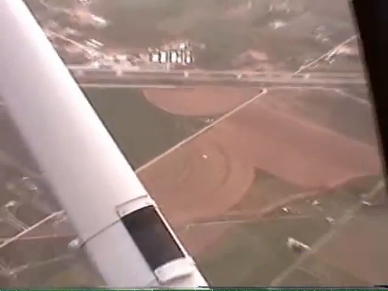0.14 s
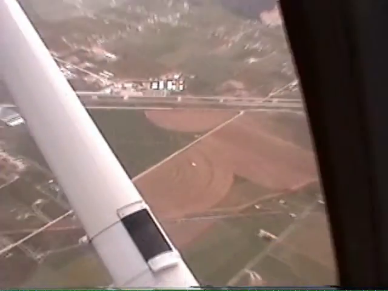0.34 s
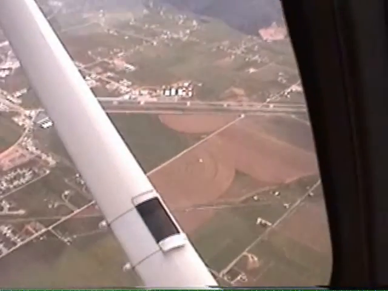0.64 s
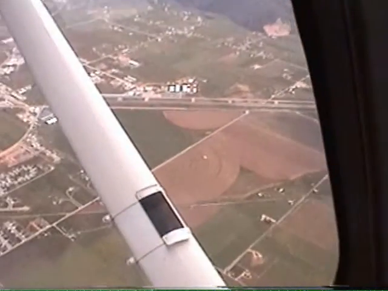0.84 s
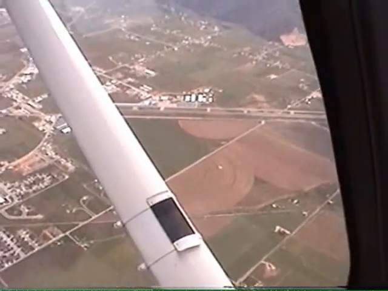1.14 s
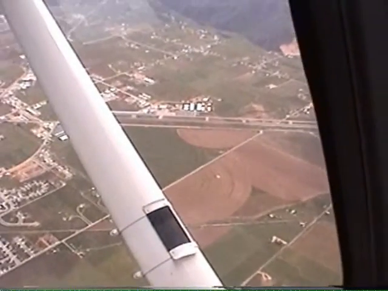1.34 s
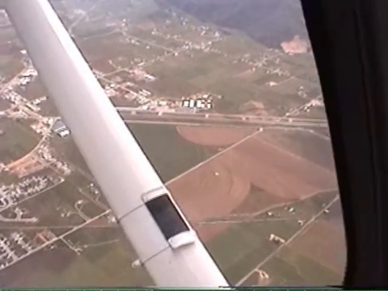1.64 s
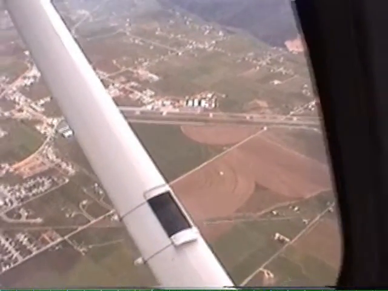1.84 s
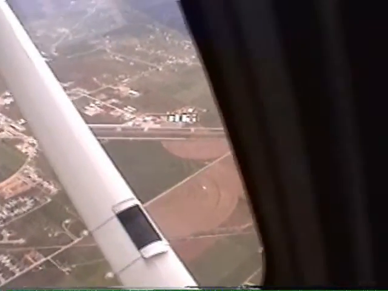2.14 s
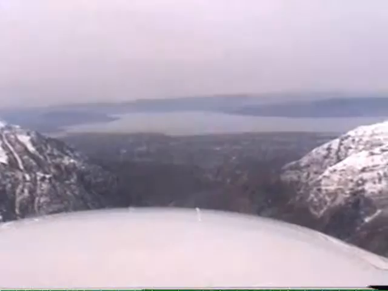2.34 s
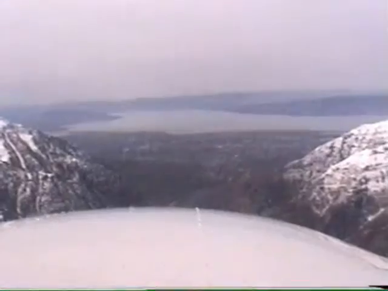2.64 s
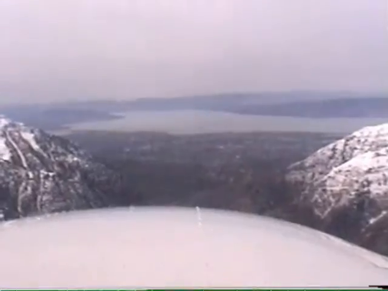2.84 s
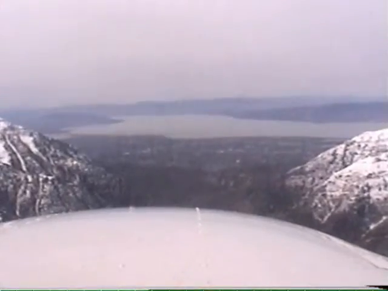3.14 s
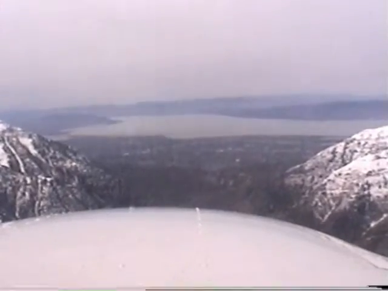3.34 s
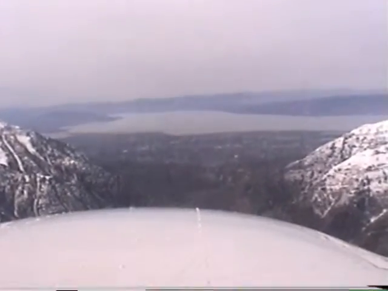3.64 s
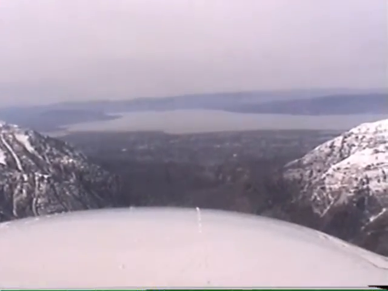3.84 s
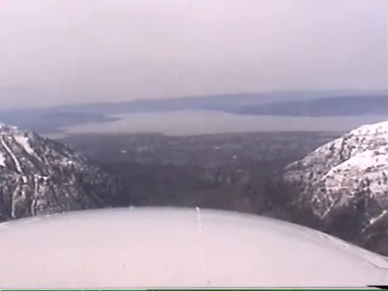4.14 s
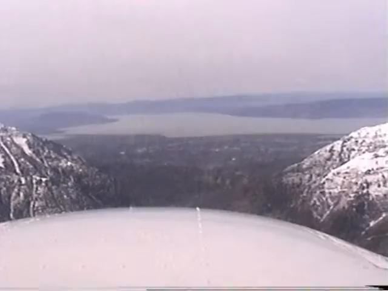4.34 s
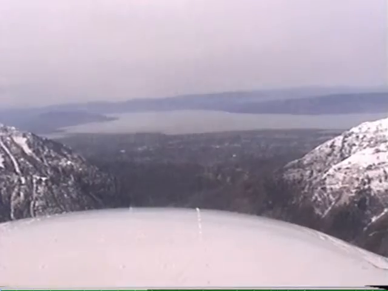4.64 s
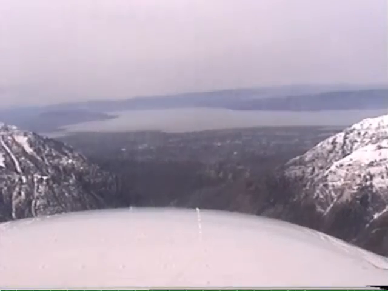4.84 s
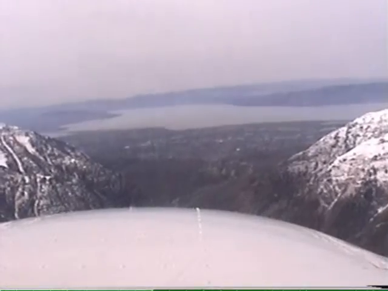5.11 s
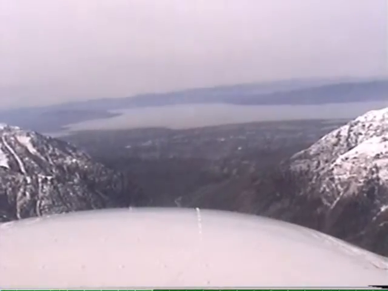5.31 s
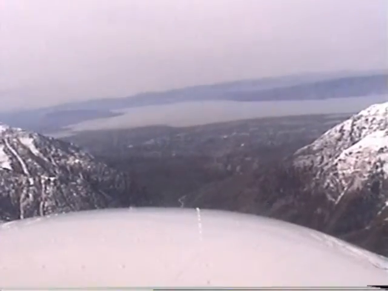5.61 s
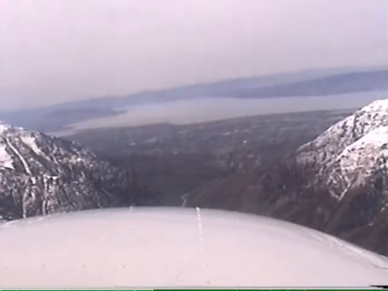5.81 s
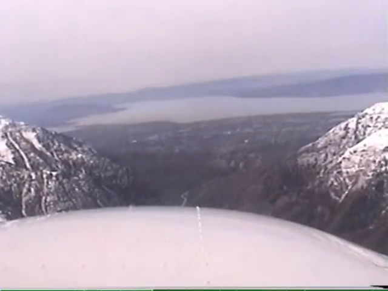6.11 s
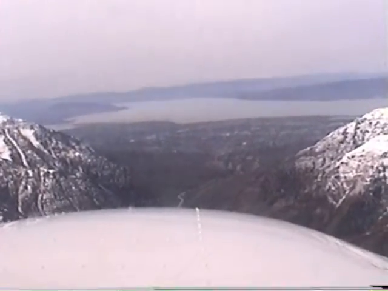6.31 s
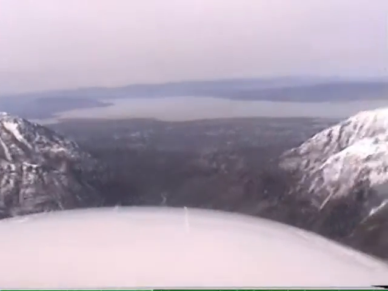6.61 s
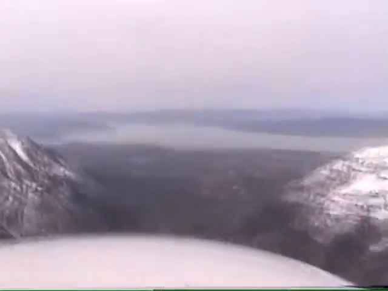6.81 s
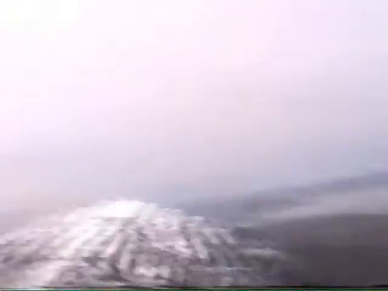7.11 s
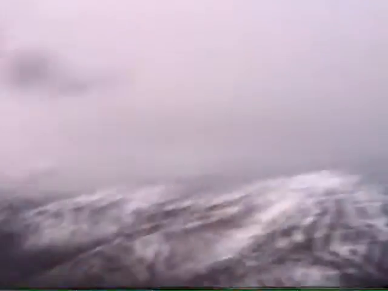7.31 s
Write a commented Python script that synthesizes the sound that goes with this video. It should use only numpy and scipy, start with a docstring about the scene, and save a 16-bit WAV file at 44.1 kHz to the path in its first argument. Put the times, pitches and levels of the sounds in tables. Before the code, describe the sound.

A light aircraft's engine and propeller drone steadily, picked up by a microphone in the cabin, with air hissing past the window. After a sudden second of near silence, the engine comes back as a rougher, ringing roar behind the windscreen. It slows very slightly, then the airflow briefly swells and the engine's tone shifts. The sound sits in the left channel.

```python
"""Inside the cabin of a four-cylinder propeller plane in cruise: two shots, a second of dead air between.
First the deep drone at the side window, then the harsher roar behind the windscreen, where engine
clatter rings the panels. Slipstream hisses through both. Exhaust pulses and propeller blades make the
drone; its low tones form standing waves, so their balance shifts as the engine slows or the camera moves.
Only the left channel is live."""
import sys
import numpy as np
from scipy.fft import rfft, irfft, next_fast_len
from scipy.io import wavfile
from scipy.ndimage import uniform_filter1d, minimum_filter1d, map_coordinates

SR = 44100
rng = np.random.default_rng(int(sys.argv[2]) if len(sys.argv) > 2 else 0)


def log_audio(samples):
    """Write samples as a 16-bit WAV file to the path given in sys.argv[1]."""
    # one column per channel
    frames = np.atleast_2d(samples).T
    # limit to full scale, then quantise
    limited = np.clip(frames, -1, 1)
    pcm = np.round(limited * 32767).astype(np.int16)
    wavfile.write(sys.argv[1], SR, pcm)


N = 328986
T = np.arange(N) / SR


def amp(db):
    """Decibels to gain."""
    return 10 ** (np.asarray(db) / 20)


def along(points, hz):
    """Read (Hz, value) breakpoints on a log frequency axis."""
    f, v = np.transpose(points)
    return np.interp(np.log(hz + 1), np.log(f + 1), v)


def automation(points):
    """(time, value) breakpoints as one value per sample."""
    return np.interp(T, *np.transpose(points))


def wobble(rate):
    """A smooth random curve, rate knots a second."""
    return map_coordinates(rng.standard_normal(int(N * rate / SR) + 4), [T * rate])


def swell(peak_s, rise_s, fall_s):
    """A smooth bump from 0 up to 1 and back."""
    return np.exp(-((T - peak_s) / np.where(T < peak_s, rise_s, fall_s)) ** 2)


def shot(start_s, end_s, fade_s):
    """A shot's envelope: quick fade in, hard cut out."""
    return (1 - np.exp(-np.maximum(T - start_s, 0) / fade_s)) * np.clip((end_s - T) / 0.0014, 0, 1)


def white():
    """Noise of unit power per Hz."""
    return rng.standard_normal(N) * np.sqrt(SR / 2)


def filtered(x, response):
    """x through a frequency response."""
    size = next_fast_len(N + SR // 2)
    return irfft(rfft(x, size) * response(np.fft.rfftfreq(size, 1 / SR)), size)[..., :N]


def coloured(x, spectrum):
    """x through a smooth (Hz, dB) EQ curve."""
    return filtered(x, lambda hz: amp(along(spectrum, hz)))


def narrow_bands(x, bands):
    """x through a bank of steep-sided band-pass peaks."""
    peak = lambda f, hz, width: (2j * f * width / (hz * hz - f * f + 2j * f * width)) ** 2
    return filtered(x, lambda f: sum(amp(db) * peak(f, hz, width) for hz, width, db in bands))


def tone(cycles, order, level_db, waver_db, drift):
    """One partial at a multiple of a running cycle count, unsteady in level and phase (drift, radians)."""
    phase = 2 * np.pi * (order * cycles + rng.random()) + drift * wobble(7)
    return np.sqrt(2) * amp(level_db + waver_db * wobble(6.6)) * np.sin(phase)


def dead_air():
    """The electronics: low rumble, mains buzz, two thin whistles, and a brief hiss after the first cut."""
    mains_hz, line_scan_hz = 60, 15734
    rumble = coloured(white(), [(10, -81), (38, -88.5), (90, -101), (300, -116), (1200, -130),
                                (15000, -135)])
    buzz_db = [(120, -88.5), (180, -90.5), (420, -96.5), (700, -112), (1000, -104), (1300, -108)]
    buzz = sum(tone(mains_hz * T, k, along(buzz_db, mains_hz * k), waver_db=1.5, drift=.1)
               for k in range(2, 20))
    whistles = amp(-88) * np.sin(2 * np.pi * 8000 * T) + amp(-82) * np.sin(2 * np.pi * line_scan_hz * T)
    hiss = coloured(white(), [(100, -89), (2000, -92.5), (6000, -96), (15000, -112)])
    hiss_db = automation([(2.47, -61.5), (2.483, 0), (2.525, -5), (2.55, -58)])
    return rumble + buzz + whistles + hiss * amp(hiss_db)


def throb(firings, cycle, shaft, blade):
    """A gain that pulses once an engine cycle, once a shaft turn and once a blade pass, at these depths."""
    pulse = lambda order: np.cos(2 * np.pi * (order * firings + rng.random()))
    return 1 + cycle * pulse(1 / 4) + shaft * pulse(1 / 2) + blade * pulse(1)


def window_slipstream(firings):
    """Propeller wash pulses in the window seal; the hiss creeps up."""
    # air at the seal: (frequency [Hz], level [dB])
    spectrum = [(500, -100), (1200, -75), (1850, -70.5), (2800, -75.5), (4300, -76), (6000, -79),
                (7500, -85.5), (12000, -95.5), (14000, -103), (15700, -113)]
    rise_db_per_s = 0.72
    level_db = -0.76 + rise_db_per_s * T + 0.52 * wobble(18) + 0.26 * wobble(4)
    hiss = amp(level_db) * coloured(white(), spectrum)
    return hiss * throb(firings, cycle=0.079, shaft=0.059, blade=0.095)


def screen_slipstream(firings):
    """Air hisses over the windscreen with a light throb."""
    # air on the windscreen: (frequency [Hz], level [dB])
    spectrum = [(500, -98.5), (1100, -68), (1400, -67), (1900, -71.5), (2800, -76.5), (4400, -77),
                (4900, -80), (8500, -87), (11000, -89.5), (12800, -92.5), (14000, -101), (15500, -108)]
    hiss = amp(0.36 + 0.56 * wobble(22)) * coloured(white(), spectrum)
    return hiss * throb(firings, cycle=0.066, shaft=0.022, blade=0.043)


def slipstream_rush():
    """A faint high sizzle, then the slipstream swells as the camera swings."""
    # the rush of air: (frequency [Hz], level [dB])
    rush_spectrum = [(600, -81), (980, -61.5), (1300, -69), (1700, -67), (3300, -70.5), (6000, -79),
                     (12000, -94), (15000, -110)]
    # the sizzle: (frequency [Hz], level [dB])
    sizzle_spectrum = [(7000, -120), (10500, -91), (13000, -88), (15000, -115)]
    rush = swell(peak_s=7.38, rise_s=0.23, fall_s=0.12) * coloured(white(), rush_spectrum)
    sizzle = swell(peak_s=6.95, rise_s=0.09, fall_s=0.09) * coloured(white(), sizzle_spectrum)
    return rush + sizzle


def clatter(firings, locked):
    """Engine vibration: the locked share of its power repeats every four firings, the rest is turbulence."""
    period = int(np.round(4 * N / firings[-1]))
    random_phases = np.exp(2j * np.pi * rng.random(period // 2 + 1))
    cycle = irfft(random_phases, period) * np.sqrt(period * SR / 2)
    loop = map_coordinates(cycle, [firings / 4 % 1 * period], mode="grid-wrap")
    return np.sqrt(locked) * loop + np.sqrt(1 - locked) * white()


def window_roar(firings, settled):
    """Dark clatter and a thin engine whine near 13 times the firing rate, a faint cabin ring below it."""
    # body of the roar: (frequency [Hz], level [dB])
    spectrum = [(15, -75), (50, -68.5), (95, -57), (200, -55), (350, -57.5), (520, -59.5), (700, -62.5),
                (820, -69), (950, -63), (1300, -76.5), (2500, -100), (6000, -140)]
    # the engine whine, then the cabin ring: (frequency [Hz], width [Hz], peak level [dB])
    whine_and_ring = [(1120, 7.3, -59.5), (1018, 40, -76)]
    shake = clatter(firings, locked=0.1) * throb(firings, cycle=0.08, shaft=0.045, blade=0.066)
    level_db = -0.77 - 2.5 * (1 - settled) + 0.56 * wobble(9)
    return amp(level_db) * (coloured(shake, spectrum) + narrow_bands(white(), whine_and_ring))


def screen_roar(firings, slowed, turned):
    """Clatter roars and rings the windscreen and panel: a little less ring when slowed, far less turned."""
    # body of the roar: (frequency [Hz], level [dB])
    spectrum = [(15, -80.5), (35, -66.5), (55, -60.5), (140, -58.5), (185, -55), (245, -56.5), (285, -61),
                (335, -51.5), (460, -57.5), (700, -55.5), (860, -66.5), (1020, -59.5), (1150, -71),
                (2200, -103), (6000, -140)]
    # ringing panels and air spaces: (frequency [Hz], width [Hz], peak level [dB])
    modes = [(757, 29.2, -50), (792, 17.8, -49), (911, 20.6, -51.5), (1190, 15, -62), (1344, 38, -66),
             (1588, 11, -62.5), (2126, 47, -73), (2409, 42, -69), (3260, 172, -69.5), (3743, 109, -77),
             (4270, 160, -76.5), (5870, 220, -83), (7970, 150, -87.5)]
    shake = clatter(firings, locked=0.12) * throb(firings, cycle=0.16, shaft=0.056, blade=0.14)
    panel_shake = clatter(firings, locked=0.1) * throb(firings, cycle=0.21, shaft=0.055, blade=0.12)
    ring = amp(-0.85 * slowed - 8 * turned) * narrow_bands(panel_shake, modes)
    return amp(0.18 + 0.66 * wobble(9)) * (coloured(shake, spectrum) + ring)


def engine_overtones(firings, orders, waver_db, drift):
    """Looser engine tones; the quarter orders come from unequal cylinders."""
    return sum(tone(firings, order, db, waver_db, drift) for order, db in orders)


def drone(firings, harmonics, shift):
    """Exhaust pulses and propeller blades: clean low harmonics that rebalance as shift goes from 0 to 1."""
    # one harmonic briefly swells or dips: (time [s], harmonic number, change [dB], half-length [s])
    fades = [(1.167, 3, -4.5, .2), (1.25, 1, -3, .45), (1.85, 2, -3.5, .3), (4.031, 4, -9.5, .25),
             (6.2, 5, 6, .3), (7.208, 2, -12.5, 0.12), (7.45, 4, -6.5, 0.11)]
    out = np.zeros(N)
    for k, (from_db, to_db) in enumerate(harmonics, 1):
        fade_db = sum(change * swell(s, half, half) for s, number, change, half in fades if number == k)
        level_db = from_db + (to_db - from_db) * shift + 0.25 * wobble(3.4) + fade_db
        out += tone(firings, k, level_db, waver_db=0.33, drift=0.067)
    return out


def side_window():
    """Beside the door the drone dominates, over roar and slipstream."""
    # engine speed: (time [s], firing rate [Hz])
    speed = [(0, 85.8), (1.4, 86.26), (1.8, 86.4), (2.48, 87)]
    # drone harmonics from the first up: (opening level [dB], settled level [dB])
    harmonics = [(-38.5, -37.5), (-22, -23.5), (-33, -27.5), (-37, -31.5)]
    # weaker engine tones: (order [x firing rate], level [dB])
    orders = [(5 / 4, -47.5), (7 / 4, -44.5), (9 / 4, -40.5), (13 / 4, -44), (19 / 4, -45), (5, -47),
              (6, -41.5), (29 / 4, -50.5), (31 / 4, -50), (8, -44.5), (9, -49), (13, -49)]
    firings = np.cumsum(automation(speed)) / SR
    settled = automation([(0.18, 0), (0.78, 1)])  # the camera comes to rest
    noise = window_roar(firings, settled) + window_slipstream(firings)
    tones = drone(firings, harmonics, settled)
    tones += engine_overtones(firings, orders, waver_db=1.2, drift=0.46)
    return (tones + noise) * shot(start_s=-1, end_s=2.482, fade_s=0.01)


def windscreen():
    """Facing the cowling the engine is harsher; turning away trades its ring for other tones."""
    # engine speed: (time [s], firing rate [Hz])
    speed = [(3.53, 81.94), (4.8, 82.08), (6.1, 80.83), (7.45, 80.93)]
    # drone harmonics against the cabin's resonances: (level at top speed [dB], at lowest speed [dB])
    harmonics = [(-29, -30), (-30, -31), (-41.5, -37.5), (-33.5, -31.5), (-50, -37.5)]
    # weaker engine tones facing forward: (order [x firing rate], level [dB])
    front_orders = [(11 / 2, -49.5), (6, -52.5), (8, -45.5), (9, -41.5), (37 / 4, -43.5), (19 / 2, -38),
                    (39 / 4, -42), (45 / 4, -48)]
    # engine tones that stand where the turn ends: (order [x firing rate], level [dB])
    turned_orders = [(6, -29.5), (15 / 2, -32), (23 / 2, -40)]
    firing_hz = automation(speed)
    firings = np.cumsum(firing_hz) / SR
    slowed = (firing_hz.max() - firing_hz) / np.ptp(firing_hz)
    turned = automation([(7.27, 0), (7.42, 1)])  # the camera swings away
    tones = drone(firings, harmonics, slowed)
    tones += (1 - turned) * engine_overtones(firings, front_orders, waver_db=1.8, drift=0.7)
    tones += turned ** 4 * engine_overtones(firings, turned_orders, waver_db=1, drift=0.36)
    noise = screen_roar(firings, slowed, turned) + screen_slipstream(firings) + slipstream_rush()
    return (tones + noise) * shot(start_s=3.509, end_s=7.6, fade_s=0.016)


def limiter(x, ceiling, samples):
    """The gain ducks for a few milliseconds around every peak above the ceiling."""
    needed = np.minimum(1, ceiling / (np.abs(x).max(axis=0) + 1e-9))
    return x * uniform_filter1d(minimum_filter1d(needed, samples), samples)


def scene():
    """Both shots on the left channel; the right carries only faint electronic noise."""
    cabin = side_window() + windscreen() + dead_air()
    idle = coloured(white(), [(20, -80), (60, -94), (200, -113), (1000, -126), (15000, -128)])
    return np.array([amp(6.0) * cabin, idle])


def record(dry):
    """The camera limits the peaks and keeps nothing above its band limit."""
    top_hz = 15780
    return filtered(limiter(dry, ceiling=0.48, samples=161), lambda hz: hz < top_hz)


dry = scene()
out = record(dry)
log_audio(out)
```